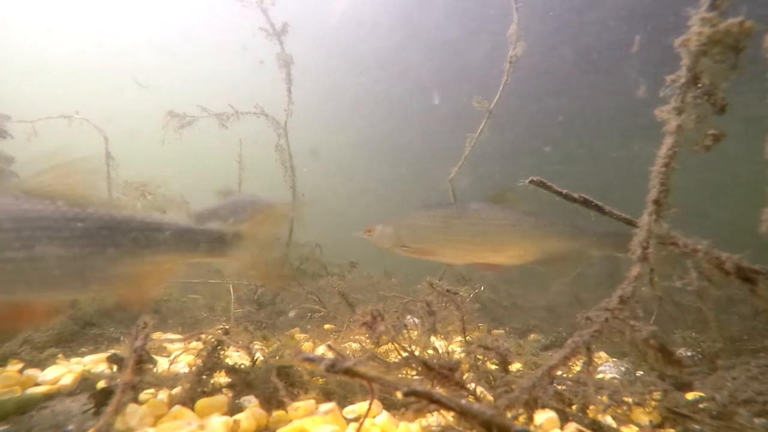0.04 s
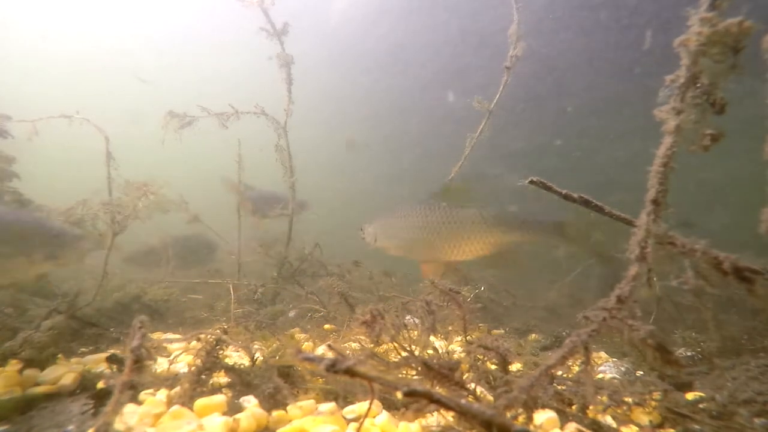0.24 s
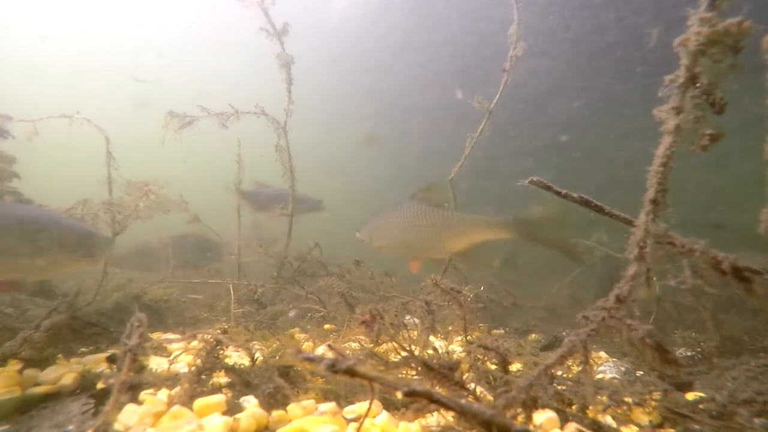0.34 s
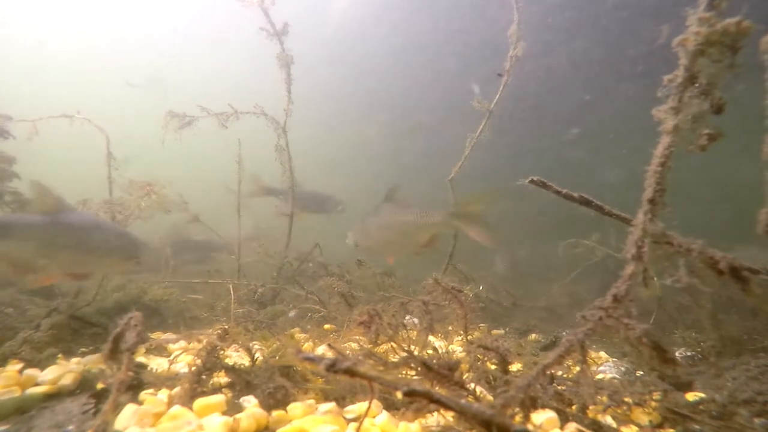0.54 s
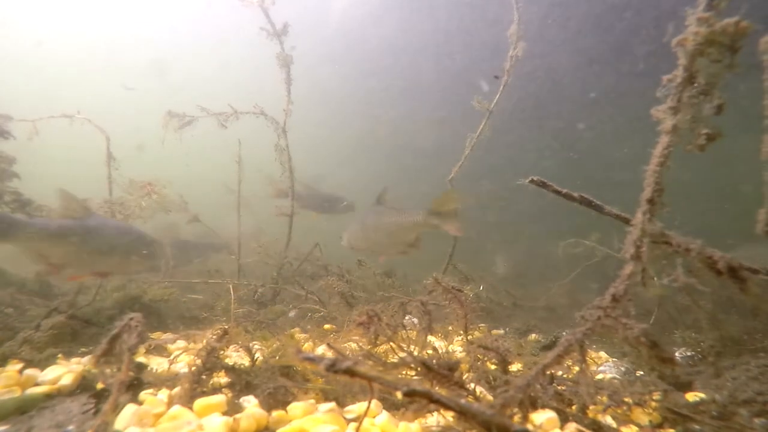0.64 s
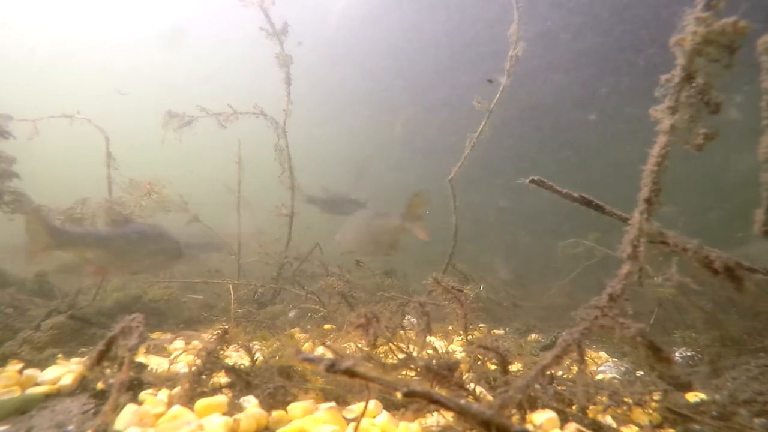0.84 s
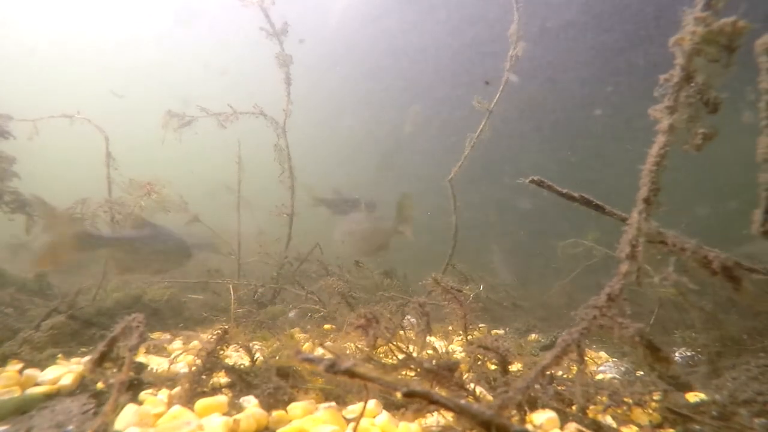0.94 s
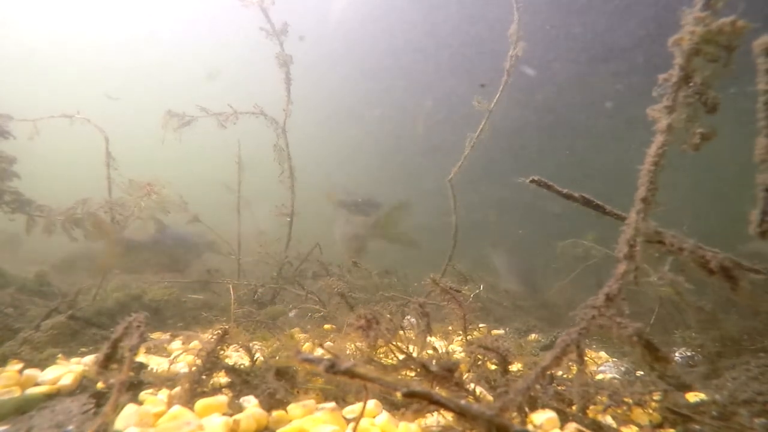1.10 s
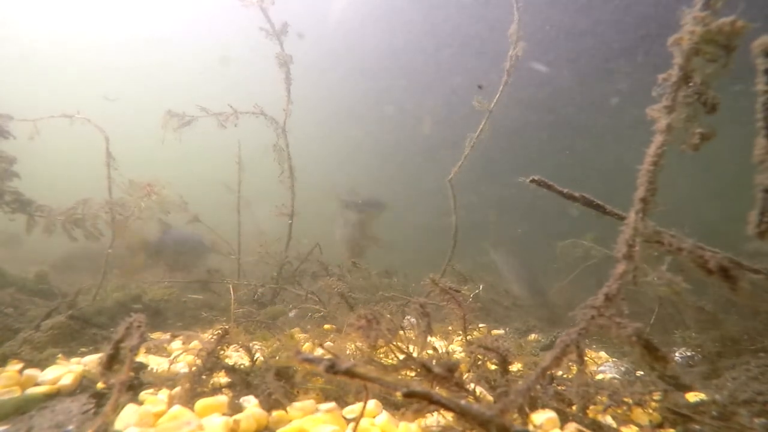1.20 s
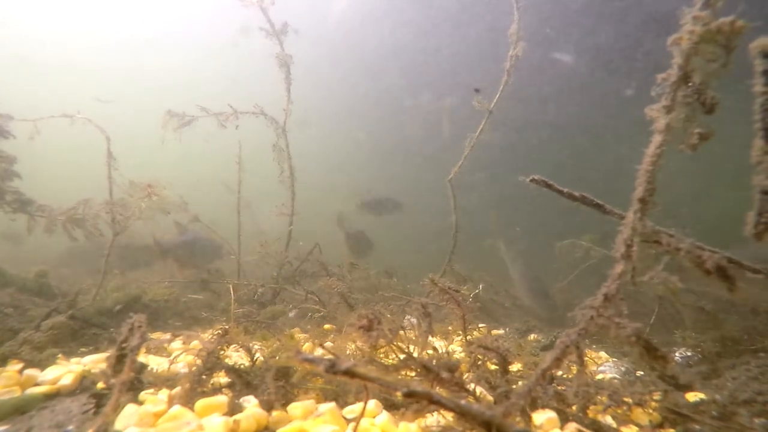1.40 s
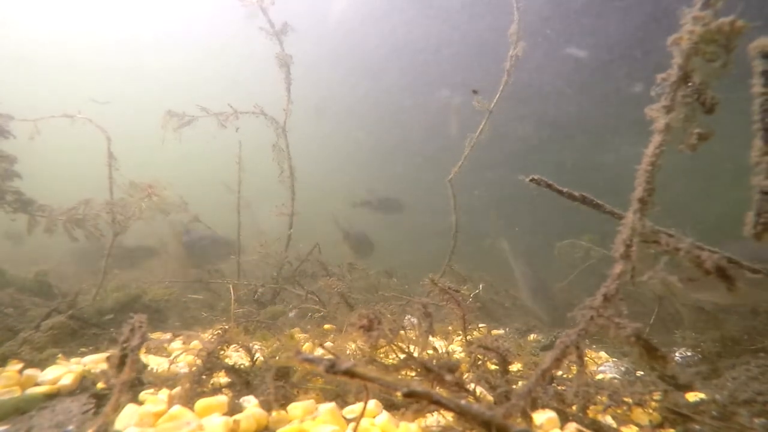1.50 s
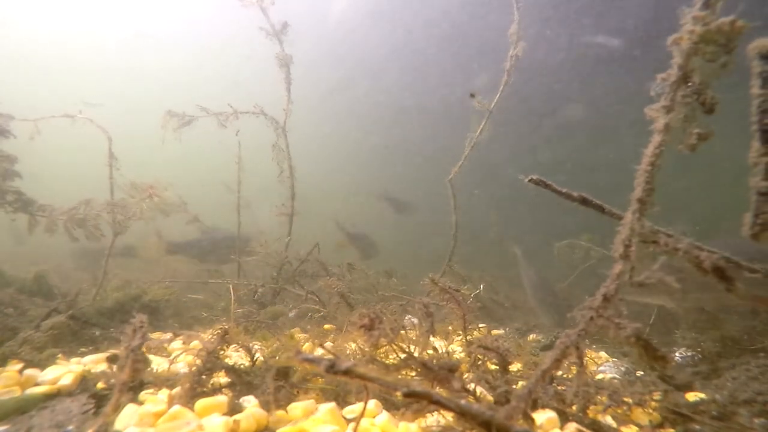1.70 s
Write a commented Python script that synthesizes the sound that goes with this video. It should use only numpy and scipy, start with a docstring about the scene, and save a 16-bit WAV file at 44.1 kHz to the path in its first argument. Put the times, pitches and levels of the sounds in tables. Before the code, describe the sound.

Short, dull underwater knocks of feeding fish over a low water murmur and hiss.

```python
"""Short, dull knocks of fish feeding on scattered grain reach a camera on the bed of a pond.
They come through the water and ring briefly in the camera's sealed housing; a few small bubbles blip.
The housing pushes one of the two microphones nearly as it pulls the other.
Under it all lie a low water murmur, a rumble and electronic hiss."""
import sys
import numpy as np
from scipy import signal
from scipy.fft import rfft, irfft
from scipy.io import wavfile

SR = 44100
rng = np.random.default_rng(int(sys.argv[2]) if len(sys.argv) > 2 else 0)


def master(y):
    """Save y as 16-bit WAV."""
    cut = np.clip(np.atleast_2d(y).T, -1, 1)
    pcm = np.round(cut * 32767)  # scale
    wavfile.write(sys.argv[1], SR, pcm.astype(np.int16))


N = 77175
EVENT_SAMPLES = 8192  # room for one knock or bubble


def knocks():
    """Each knock is a pulse, its echo off the bed, a ring in the housing and scatter in shallow water."""
    # Each row: start in seconds, peak in dB, brightness in dB per octave, housing ring in dB,
    # echo delay in seconds, echo level in dB against the knock.
    hits = [(0.1184, -31, 21, -3.0, 0.002, -10), (0.2183, -13.0, 5, -16.5, 0.0018, -18.0),
            (0.2288, -21, 8, -14, 0.0022, -16), (0.2403, -25, 1, 9, 0.0018, -5),
            (0.2637, -32, 12, -1, 0.002, -12), (0.3558, -1.0, 3.5, -6, 0.002, -16),
            (0.3719, -15.5, -5.5, 6.5, 0.0022, -18), (0.4461, -6, -1, 2, 0.0017, -30),
            (0.6832, -31, 13.5, -2.0, 0.0023, -4.0), (0.6852, -22, -10, 4, 0.0016, -18),
            (0.6906, -30, 13.0, 6.0, 0.0018, 0), (0.9242, -27.5, 12, 1, 0.0016, -8),
            (0.9411, -33, 16, 6, 0.0017, -10), (0.9522, -20, 9.5, 7.5, 0.0017, -10),
            (0.9583, -34.0, 0, 4.5, 0.0019, -14.5), (0.962, -24, 12, 9, 0.00165, -4),
            (0.9735, -23, 13, 10, 0.00162, -5), (0.9843, -28, 6, 10, 0.0014, -14),
            (1.0189, -26, 1, 0, 0.0017, -15.5), (1.0524, -14.5, -0.5, 3, 0.0016, -10),
            (1.233, -31.5, 19.5, -1.0, 0.0016, -18), (1.2948, -24.5, 5.5, 13, 0.0016, -12),
            (1.315, -33.0, 23, -2.5, 0.0021, -12.0), (1.4207, -30, 3.5, 13.5, 0.002, -6),
            (1.5887, -18.0, -4.5, 10, 0.0013, -16), (1.6137, -34.5, -12, 8, 0.0014, -20.0),
            (1.6605, -34.5, -18, 11, 0.0022, -8), (1.6816, -37.0, 8.5, 7.0, 0.0019, -9.0)]
    # The housing's own tones. Each row: pitch in Hz, level in dB against the knock, seconds to fade 60 dB.
    tones = [(753, -23, 0.041), (897, -16, .045), (1240, -25, 0.035), (1760, -22.5, .043)]
    echo_tilt, scatter_tilt = -4.5, -1.5  # dB per octave: both are duller than the knock
    scatter_db, scatter_fade_s = -16.5, 0.26
    out, t = np.zeros(N), np.arange(EVENT_SAMPLES) / SR
    for start, db, brightness, ring_db, echo_s, echo_db in hits:
        hit = pulse(brightness)
        ring = sum(from_db(tone_db + ring_db - 60 * t / fade_s) * np.sin(2 * np.pi * hz * t)
                   for hz, tone_db, fade_s in tones)
        paths = rng.standard_normal(EVENT_SAMPLES) * from_db(-60 * t / scatter_fade_s) * (t > echo_s)
        scatter = signal.fftconvolve(pulse(brightness + scatter_tilt), paths / np.linalg.norm(paths))
        add(out, start, from_db(db) * hit)
        add(out, start + echo_s, from_db(db + echo_db) * pulse(brightness + echo_tilt))
        add(out, start, from_db(db) * signal.fftconvolve(hit, ring) / np.abs(rfft(hit)).max())
        add(out, start, from_db(db + scatter_db) * scatter)
    return out


def pulse(brightness):
    """A click that the housing squeezes to two or three swings, with a peak of about 1."""
    # What water and housing let through. Each row: frequency in Hz, relative level in dB.
    colour = [(40, -28), (300, -48), (450, -12.5), (600, -4), (850, 3.5), (1050, 2.5), (1350, 4.5),
              (1600, -0.5), (1900, -5.5), (2200, -17.5), (2500, -32), (3200, -56), (6000, -64)]
    hz = frequencies(EVENT_SAMPLES)
    octaves = np.log2(np.clip(hz, 500, 1900) / 1200) * np.clip(hz / 400, 0, 1)
    gain = from_db(at_hz(colour, hz)[0] + brightness * octaves)
    # Build a click with this tone colour that is silent before it strikes (minimum phase).
    cepstrum = irfft(np.log(gain))
    cepstrum[EVENT_SAMPLES // 2:] = 0
    click = irfft(np.exp(2 * rfft(cepstrum)))
    return click / np.abs(signal.hilbert(click)).max()


def thud(hits):
    """The lowest part of a knock shakes both microphones alike."""
    top_hz, gain_db = 129, -2.5
    return from_db(gain_db) * signal.sosfilt(signal.butter(4, top_hz, fs=SR, output="sos"), hits + 1e-18)


def bubbles():
    """Each bubble swells, rings and dies while its pitch rises a little."""
    # Each row: start in seconds, pitch in Hz, level in dB, seconds to fade 60 dB.
    blips = [(.1180, 2020, -35, .014), (0.4324, 1750, -14, .028), (0.496, 2015, -25, .018),
             (.6818, 2030, -31.5, .015), (.6852, 940, -21.5, 0.039), (.8500, 2110, -36, 0.024),
             (1.1557, 2000, -23.5, .018), (1.3670, 1710, -36, 0.021), (1.5535, 2115, -37, .027)]
    swell_s, rise_per_s = 0.0012, 1  # the rise is a share of the starting pitch
    out, t = np.zeros(N), np.arange(EVENT_SAMPLES) / SR
    swell = 1 - np.exp(-(t / swell_s) ** 2)
    for start, hz, db, fade_s in blips:
        tone = np.sin(2 * np.pi * hz * t * (1 + rise_per_s * t / 2))
        add(out, start, from_db(db - 60 * t / fade_s) * swell * tone)
    return out


def microphones(water):
    """The housing pushes one microphone as it pulls the other; balance and timing vary with pitch."""
    # Each row: frequency in Hz, left minus right in dB, left's lead over the flipped right in radians.
    feed = [(196, -1.5, 0.23), (402, -3.5, -.15), (535, 0.5, -0.35), (710, 3, -0.85), (853, 2.5, -0.27),
            (1123, 4, 0.55), (1370, 1.5, 0.43), (1607, -1.1, 0.95), (2370, 1.2, 1.33), (2600, -5, -.69)]
    size = 2 * N
    balance_db, lead = at_hz(feed, frequencies(size))
    left = from_db(balance_db / 2) * np.exp(1j * lead / 2)
    return irfft(rfft(water, size) * np.array([left, -1 / left]), size)[:, :N]


def murmur():
    """The water murmurs steadily, heard through the housing."""
    # Each row: frequency in Hz, relative level in dB.
    colour = [(20, -36), (100, -38), (150, 4.5), (190, -1.5), (300, 0.5), (600, 1), (740, -1), (870, 5),
              (1100, -1.5), (1350, -3), (1900, -7.5), (2400, -21), (4000, -53)]
    return from_db(-45.5) * coloured_noise(colour)


def rumble():
    """A low rumble, unrelated at the two microphones."""
    # Each row: frequency in Hz, relative level in dB.
    colour = [(20, -54), (48, -36), (60, -19.5), (72, -40), (112, -26), (145, -3), (180, 0.5), (300, -6.5),
              (500, -11), (1000, -21.5), (2000, -26), (4000, -38)]
    return from_db(-48) * np.array([coloured_noise(colour), coloured_noise(colour)])


def hiss():
    """The electronics hiss separately in each channel; the right one also whistles thinly."""
    # Each row: frequency in Hz, relative level on the left in dB, the same on the right.
    colour = [(100, -12, -8.5), (2470, 3.5, 5), (4900, -1.8, -0.5), (7600, -0.5, 0.5), (7800, -4, 0.5),
              (9630, -1.5, 2), (11200, -7, -4), (12300, -6.5, -6), (13200, -20, -15), (14600, -17, -25)]
    whistle_hz, width_hz = 7725, 100
    hz = frequencies(N)
    left_db, right_db = at_hz(colour, hz)
    left = from_db(-55.5) * noise(from_db(left_db))
    right = from_db(-54) * noise(from_db(right_db))
    whistle = from_db(-66.5) * noise(1 / (1 + (2 * (hz - whistle_hz) / width_hz) ** 2))
    return np.array([left, right + whistle])


def from_db(db):
    """Turn decibels into a gain."""
    return 10 ** (np.asarray(db) / 20)


def frequencies(size):
    """The frequencies in Hz in a spectrum of that many samples."""
    return np.maximum(np.arange(size // 2 + 1) * SR / size, 1)


def at_hz(rows, hz):
    """Read each column of a table at these frequencies, blending between rows by octaves."""
    points, *columns = np.transpose(rows)
    return [np.interp(np.log(hz), np.log(points), column) for column in columns]


def noise(gain):
    """Steady noise shaped by a gain per frequency, at an average (rms) level of 1."""
    x = irfft(rfft(rng.standard_normal(N)) * gain, N)
    return x / np.sqrt(np.mean(x ** 2) + 1e-20)


def coloured_noise(colour):
    """Steady noise shaped by a table of Hz and dB."""
    return noise(from_db(at_hz(colour, frequencies(N))[0]))


def add(out, start, sound):
    """Mix a sound into out at a start time in seconds."""
    i = int(np.clip(round(start * SR), 0, N - 1))
    out[i:i + len(sound)] += sound[:N - i]


def scene():
    """Knocks, bubbles and murmur come through the housing, over rumble and hiss."""
    hits = knocks()
    water = hits + bubbles() + murmur()
    return microphones(water) + thud(hits) + rumble() + hiss()


def record(dry):
    """The highest treble is cut off steeply."""
    cutoff_hz = 14600
    return signal.sosfilt(signal.ellip(12, .1, 70, cutoff_hz, fs=SR, output="sos"), dry)


dry = scene()
out = record(dry)
master(out)
```